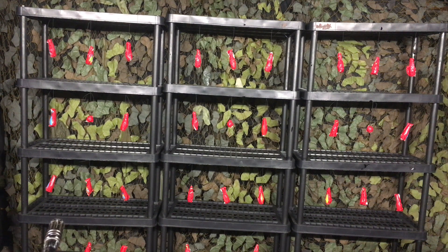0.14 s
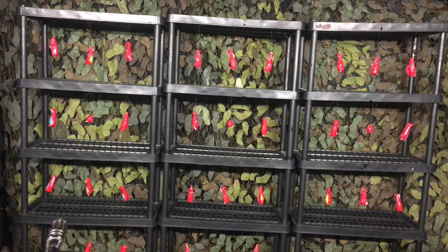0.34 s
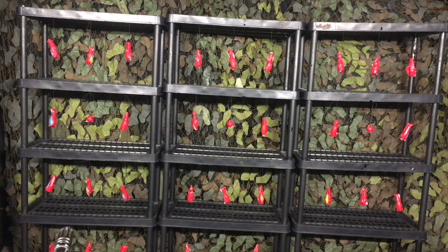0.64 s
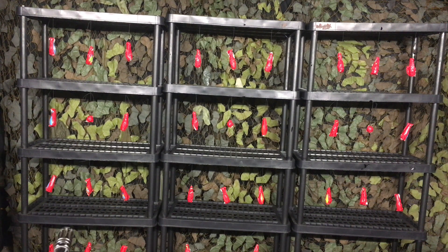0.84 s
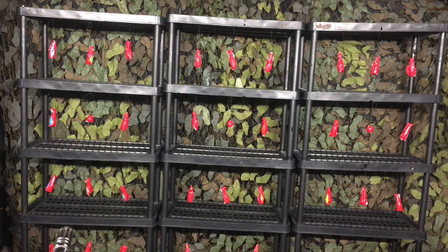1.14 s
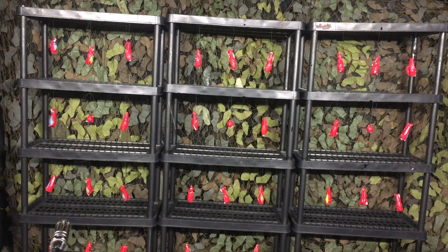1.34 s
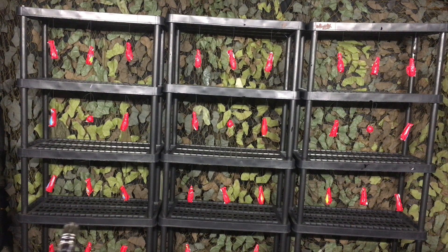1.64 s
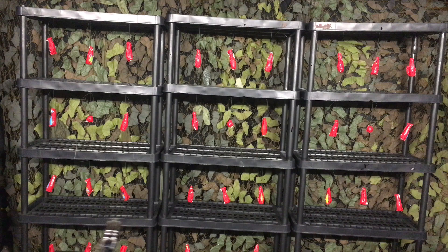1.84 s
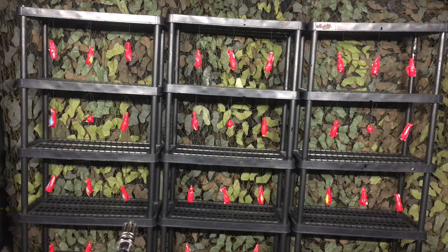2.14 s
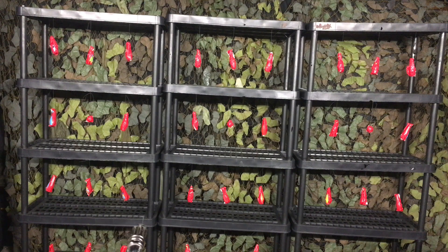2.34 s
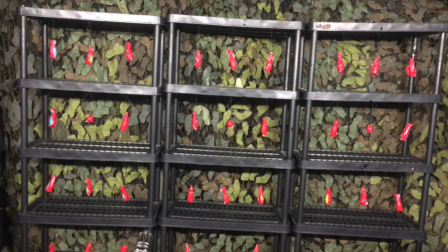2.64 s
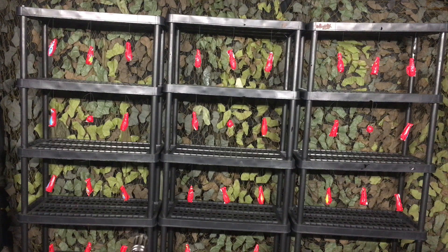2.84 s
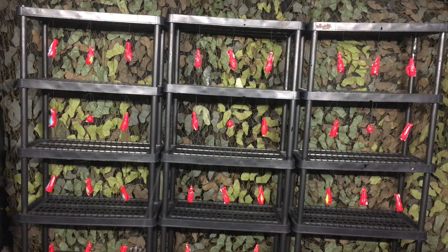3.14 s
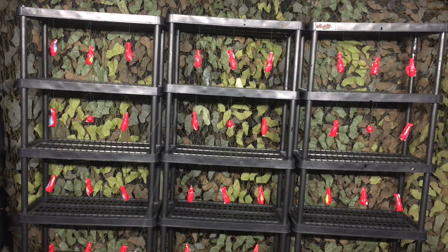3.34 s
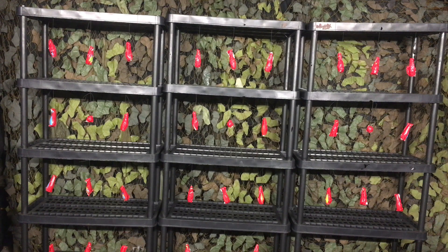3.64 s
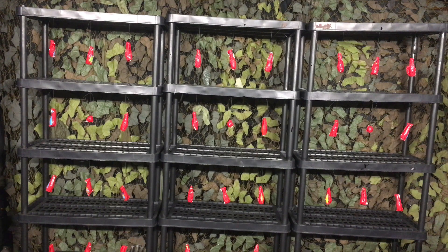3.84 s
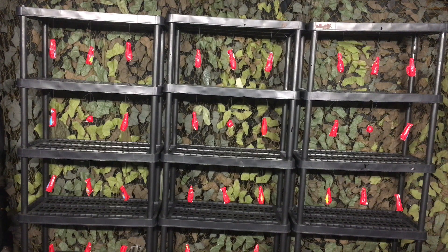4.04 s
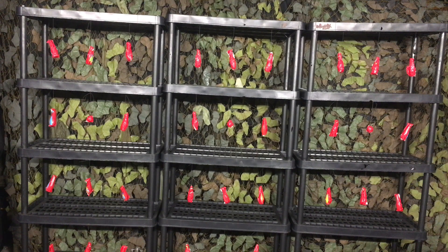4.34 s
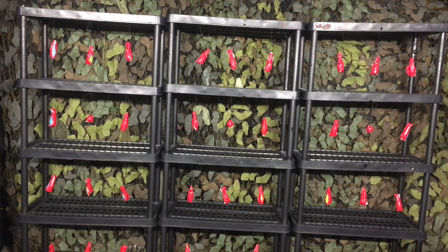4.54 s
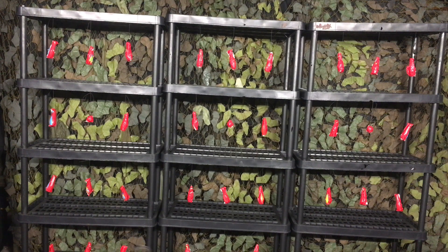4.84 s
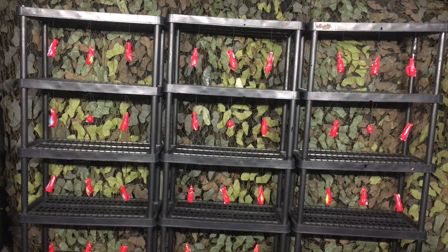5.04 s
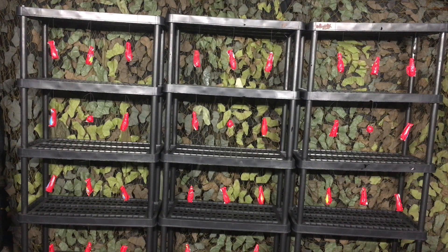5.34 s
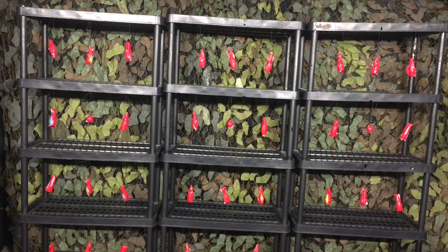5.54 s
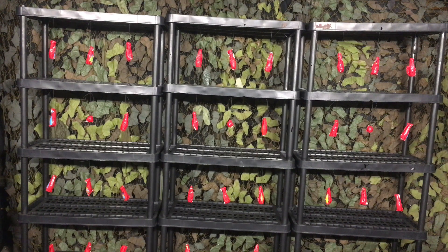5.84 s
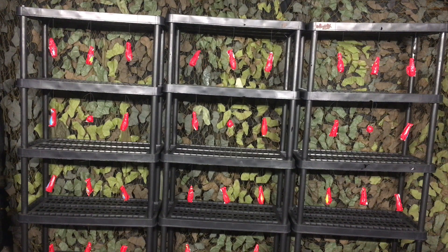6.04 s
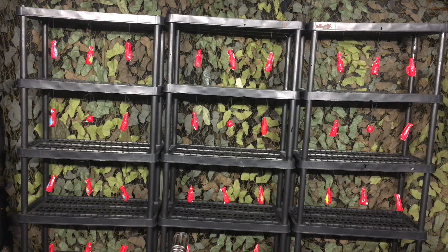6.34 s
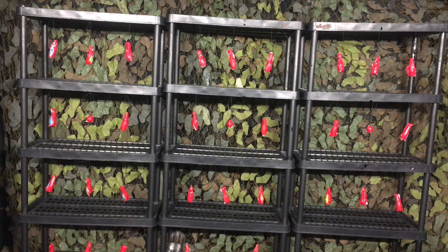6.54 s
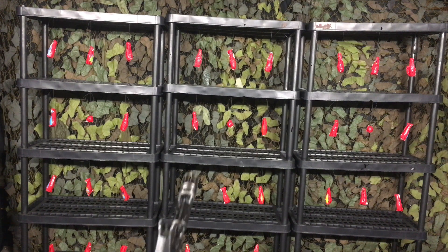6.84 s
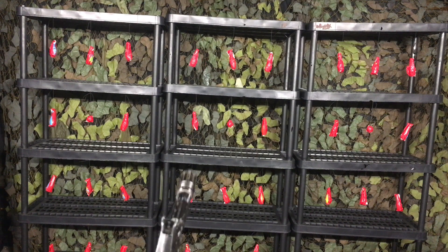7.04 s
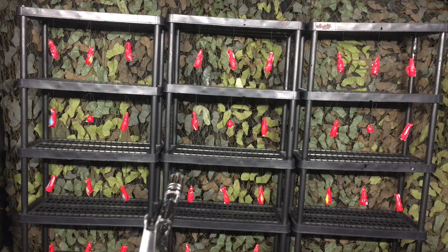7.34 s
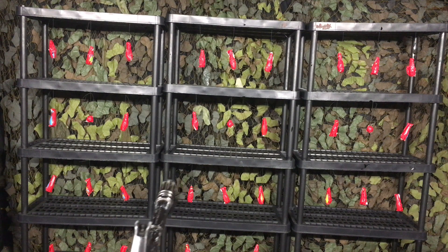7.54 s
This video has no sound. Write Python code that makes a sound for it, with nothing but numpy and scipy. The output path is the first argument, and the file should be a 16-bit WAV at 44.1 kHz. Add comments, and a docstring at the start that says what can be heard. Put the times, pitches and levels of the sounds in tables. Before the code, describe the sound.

A battery-driven pellet gun whirrs and snaps right by the microphone, roughly four shots a second in strings. Pellets crack brightly against hanging targets across the room or thud dully into the backdrop. Between strings, trigger clicks, loose rattles and tiny bouncing pellets are heard over faint humming room noise, with short echoes. The firing thins out, leaving one lone shot at the end.

```python
"""An electric airsoft rifle, close to the microphone, fires single shots in a small indoor range for 7.7 s.
Each cycle starts with motor whine and tooth rasp as the spring winds, then the sear lets go and the piston slams.
Some 40 ms later the pellet cracks into a target or thuds into the backdrop, both made of filtered noise.
Six brisk shots come first, then a second run; after two lone gaps a third brisk run follows from 5.1 to 6.2 s,
then one last shot at 7.6 s. Clicks and spent pellets sound between; faint handling ticks and room noise lie below."""
import sys
import numpy as np
from scipy import signal
from scipy.fft import rfft, irfft
from scipy.io import wavfile
from scipy.ndimage import uniform_filter1d

SR = 44100
rng = np.random.default_rng(int(sys.argv[2]) if len(sys.argv) > 2 else 0)


def master_out(mix):
    """Clip the mix to full scale and print it as 16-bit PCM to the path in sys.argv[1]."""
    frames = np.transpose(np.atleast_2d(mix))
    ceiling = np.clip(frames, -1, 1)
    pcm = np.round(ceiling * 32767).astype(np.int16)
    wavfile.write(sys.argv[1], SR, pcm)


N = 339570
SIZE = 16384  # samples in one sound event
AGE = np.arange(SIZE) / SR  # s since the event began
FREQS = np.maximum(np.fft.rfftfreq(SIZE, 1 / SR), 1)  # Hz

# Shots, close by: [piston slam t/s, top motor speed f/Hz, relative gearbox level/dB]
SHOT_TIMES = [(0.0739, 573, 2.5), (0.3378, 545, -3), (0.576, 538, -2.0), (0.8161, 565, -1.5),
              (1.0823, 555, -2), (1.3305, 560, -0.5), (2.0119, 579, 2.5), (2.2667, 596, -2.5),
              (2.4945, 567, -1.6), (2.7144, 565, -3), (3.16, 555, 0.5), (3.3615, 554, -2.5),
              (3.593, 591, -1), (3.836, 598, 0.5), (4.41, 582, 2.5), (5.0659, 581, 1.5), (5.3537, 553, -1),
              (5.6037, 575, -3.5), (5.8677, 574, -3.5), (6.1766, 597, -0.5), (7.5874, 582, 3.5)]
# Small movements of each cycle: [t/s from the slam, level/dB, centre f/Hz, width f/Hz, t60/s]
# In order: nozzle slides back, next pellet is fed, sear lets go, piston pushes air ahead of it,
# nozzle snaps shut, a noisy crunch as the piston slams.
MECHANISM_NOISES = [(-.043, -40, 166.2, 105.9, 0.076), (-.0135, -39, 11500, 6740, 0.15),
                    (-.0094, -21, 1444, 1237, 0.045), (-.003, -24, 268.5, 303.5, 0.0077),
                    (-.0013, -9.5, 4130, 3500, 0.0032), (.0003, -16, 2720, 3700, 0.012)]
# The piston hits the cylinder head and rebounds: [t/s from the slam, relative level/dB]
PISTON_BLOWS = [(.0003, -3), (.00088, 3.5), (.0025, 2)]
# Modes of the gearbox shell: [f/Hz, level/dB, t60/s]
SHELL_MODES = [(640, -44.5, 0.0012), (1160, -33.5, 0.0061), (1143, -18.5, 0.01), (1385, -36, 0.027),
               (2028, -15.5, 0.0056), (2620, -18.5, 0.0065), (3220, -21.5, 0.0062), (4070, -38.5, 0.0018),
               (6070, -18, 0.002)]
# The spring kicks the stock at release and again at the slam: [t/s from the slam, relative level/dB]
SPRING_KICKS = [(-.009, -1), (.003, 1)]
# Modes of stock and receiver: [f/Hz, level/dB, t60/s]
STOCK_MODES = [(70, -30, 0.059), (146, -37, 0.09), (207.2, -24, 0.043), (289.4, -25.5, 0.041),
               (330, -30.5, 0.16), (564, -37, 0.052), (701, -42.5, 0.17)]


def rifle(wind_s=0.095, run_s=0.0809, gear_db=-1, action_db=0, slam_db=1, kick_db=0):
    """Each shot is one gearbox cycle: motor, small noises, piston blows on the shell, kicks on the stock."""
    out = np.zeros(N)
    for s, top_hz, level_db in SHOT_TIMES:
        add(out, s - wind_s, from_db(gear_db + level_db) * gearbox(top_hz, run_s))
        for lag, db, hz, width, t60 in MECHANISM_NOISES:
            burst = noise(resonance(hz, width) ** 2)
            add(out, s + lag, from_db(action_db + db) * burst / burst.std() * fade(t60))
        shell = high_pass(struck(SHELL_MODES, scatter_db=4.76), hz=149)
        stock = high_pass(struck(STOCK_MODES, scatter_db=3.0), hz=87)
        for lag, db in PISTON_BLOWS:
            add(out, s + lag, from_db(slam_db + db) * shell)
        # the two kicks push in opposite directions
        for (lag, db), direction in zip(SPRING_KICKS, (1, -1)):
            add(out, s + lag, direction * from_db(kick_db + db) * stock)
    return out


# Gear whine: [multiple of the motor speed, rms level/dB before housing and load]
WHINE_ORDERS = [(1, -53), (2, -46), (3, -34), (4, -41.5), (5, -38), (6, -31.5), (8, -40), (10, -42),
                (12, -52)]
# Rasp of the gear teeth: [f/Hz, relative density/dB]
TOOTH_RASP = [(120, -42), (500, -26), (950, -31), (1170, -24), (1450, -32), (2100, -22), (3000, -22),
              (4300, -24), (5000, -32.5), (7000, -32.5), (10500, -46), (15000, -40.5)]
# The gearbox housing favours some pitches of the whine: [f/Hz, width f/Hz, gain/dB]
HOUSING_PEAKS = [(1080, 220, -1.5), (1370, 100, -4.5), (2000, 340, 3.5), (2850, 490, -3), (3163, 53, 11.5),
                 (4155, 300, 7.5), (5540, 5600, -8.5)]


def gearbox(top_hz, run_s, spin_up_s=0.023, load_s=0.028, brake_s=0.0055, tooth_depth=0.17):
    """The motor spins up; whine and tooth rasp grow as the spring loads and die once it is released."""
    speed = top_hz * (1 - np.exp(-AGE / spin_up_s))
    speed = speed * (1 + .006 * flutter(hz=80))
    angle = 2 * np.pi * np.cumsum(speed) / SR
    running = np.exp(-np.maximum(AGE - run_s, 0) / brake_s)
    load = 1 - np.exp(-(AGE / load_s) ** 2)
    housing = peaks(HOUSING_PEAKS)
    whine = 0
    for k, db in WHINE_ORDERS:
        # the teeth mesh unevenly, so each order stutters as it sweeps through the housing's resonances
        stutter = from_db(2.5 * flutter(hz=70) + 1.5 * rng.standard_normal())
        phase = rng.uniform(0, 2 * np.pi) + .15 * flutter(hz=150)
        tone = np.sin(round(k) * angle + phase)
        housing_gain = np.interp(k * speed, FREQS, housing)
        whine = whine + from_db(db) * housing_gain * load ** (k / 5) * stutter * tone
    rasp = noise(colour(TOOTH_RASP)) * (1 + tooth_depth * np.sin(angle)) * load
    return (np.sqrt(2) * whine + high_pass(rasp, hz=250)) * running


# Trigger and handling clicks, right at the microphone, levels relative:
# [t/s, grip knock level/dB, metal tick level/dB, tick f/Hz, rattle level/dB]
TRIGGER_CLICKS = [(0.5101, -26, -25, 9500, -20), (0.7626, -31, -14, 7530, -22),
                  (1.5097, -22, -24.5, 3520, -8.5), (1.6003, -29.5, -32.5, 4170, -2.5),
                  (1.9195, -26, -18.5, 8400, -6.5), (2.974, -42, -36, 4000, 1),
                  (2.994, -23.5, -23, 3760, -14), (3.0112, -31.5, -20.5, 6460, -3),
                  (4.1545, -23.5, -23, 3750, -33), (4.193, -25, -53, 3500, -21),
                  (4.2967, -25.5, -26.5, 3100, -5.5), (4.832, -29, -48, 6000, -14),
                  (6.5138, -27.5, -29, 3500, -22), (6.932, -15.5, -17.5, 9100, -15),
                  (7.263, -26.5, -58, 2500, -24)]
# Colour of the hollow grip: [f/Hz, relative density/dB]
GRIP_COLOUR = [(200, -21.5), (500, -13.5), (950, -2), (1600, 1), (2300, 7), (3300, -17), (6000, -32),
               (15000, -50)]


def trigger(level_db=4, t60=0.0074, rattle_t60=0.14, tick_width=1.0, knock_rise_s=0.00046):
    """Short noise clicks in the hollow grip; loose parts rattle on more slowly after each."""
    out = np.zeros(N)
    for s, knock_db, tick_db, tick_hz, rattle_db in TRIGGER_CLICKS:
        knock = from_db(knock_db) * noise(colour(GRIP_COLOUR)) * (1 - np.exp(-AGE / knock_rise_s))
        tick = from_db(tick_db) * noise(resonance(tick_hz, tick_width * tick_hz) ** 2)
        decay = from_db(level_db) * fade(t60) + from_db(rattle_db) * fade(rattle_t60)
        add(out, s, (knock + tick) * decay)
    return out


def handling(per_s=26, level_db=-52, spread_db=5):
    """Hands shifting on the rifle: faint noise ticks of uneven strength at random times."""
    strength_db = level_db + np.minimum(spread_db * rng.standard_normal(N), 10)
    ticks = (rng.random(N) < per_s / SR) * from_db(strength_db)
    tick = noise(colour([(500, 2.0), (1700, -1), (5000, -12.5), (15000, -13.5)])) * fade(t60=0.018)
    return signal.fftconvolve(ticks, tick)[:N]


# Pellets on a target across the room: [t/s, relative level/dB, lowest mode f/Hz,
# brightness/dB per octave, relative crack over ring-out/dB, strongest ring f/Hz]
TARGET_HITS = [(0.1104, -20, 2600, -1.5, 9.5, 5260), (0.3789, -21, 2350, -1, 8.5, 6800),
               (0.615, -18.5, 2000, -2, 4.5, 5600), (0.855, -20, 1090, .3, 8, 3400),
               (1.1231, -26, 1040, -0.5, 10, 8400), (1.367, -15.5, 3130, -4, 1.5, 3600),
               (2.0484, -16, 1800, -3, 1.5, 3440), (2.3032, -17, 2340, -2, 2.5, 5730),
               (2.5343, -15, 980, -3, 2.5, 961), (2.7544, -17, 2440, -5, 4, 6380),
               (3.6351, -23.5, 2000, -4.5, 10, 3300), (4.441, -31.5, 1300, 2.5, 8, 6400),
               (4.4551, -29, 1010, -3, 11.5, 4500), (5.1112, -23.5, 1410, -2, 11, 2270),
               (5.3977, -22, 1960, -3.5, 8, 5500), (5.6393, -17.5, 2320, -1.5, 3.5, 5340),
               (5.905, -19, 2620, -3, 9.5, 3830)]
# Misses on the backdrop: [t/s, relative level/dB, brightness/dB per octave, strongest ring f/Hz]
BACKDROP_THUDS = [(3.2003, -15, -2, 920), (3.4039, -17, 0.6, 1015), (3.878, -19, 1.8, 1024),
                  (6.2224, -18.5, 0, 1500), (7.6329, -18.5, 2, 1120)]
# The backdrop's dull colour: [f/Hz, gain/dB]
BACKDROP_COLOUR = [(350, 3.5), (950, 1), (2000, -5), (3700, -15), (6200, -19.5), (11000, -26)]
# Spent pellets off shelves and floor: [t/s, relative level/dB, lowest mode f/Hz, brightness/dB per octave]
PELLET_BOUNCES = [(1.5703, -49, 2110, -4), (1.626, -47, 1980, -3), (1.8212, -57.5, 3380, 2.5),
                  (2.834, -27.5, 2500, -3), (3.0369, -31, 1985, 1), (4.0022, -41, 980, -0.5),
                  (6.049, -42, 2410, -4.5), (6.6278, -56, 2346, -8), (6.819, -53, 3600, -11),
                  (7.119, -58.5, 1030, -11)]


def pellets(hit_db=2.0, miss_db=4.0, ricochet_db=4.0):
    """Targets crack brightly, the backdrop thuds, spent pellets tick: one impact each on its own body."""
    out = np.zeros(N)
    for s, db, mode_hz, brightness_db, crack_db, ring_hz in TARGET_HITS:
        body = small_body(mode_hz, brightness_db)
        add(out, s, from_db(hit_db + db) * impact(body, crack_db, ring_hz))
    backdrop = colour(BACKDROP_COLOUR) * low_cut(hz=213)
    for s, db, brightness_db, ring_hz in BACKDROP_THUDS:
        body = backdrop * slope(brightness_db, pivot_hz=1200)
        add(out, s, from_db(miss_db + db) * impact(body, crack_db=12, ring_hz=ring_hz))
    for s, db, mode_hz, brightness_db in PELLET_BOUNCES:
        body = small_body(mode_hz, brightness_db)
        add(out, s, from_db(ricochet_db + db) * impact(body, crack_db=4.5, ring_hz=mode_hz))
    return out


# Resonances that colour the echoes of every impact: [f/Hz, width f/Hz, gain/dB]
TARGET_RINGS = [(3350, 190, 3.5), (4087, 72, 6), (5570, 310, 2.5), (5880, 69, 3.5), (6600, 360, 5),
                (9630, 1500, 6.5), (10260, 350, -7.5)]


def impact(struck_thing, crack_db, ring_hz, t60=.22, ring_db=7, ring_share=0.031,
           snap_db=13, snap_bright_db=3.0, build_s=0.00078, crack_s=.008, crack_offset_db=-6,
           grain_db=4, grain_s=0.0023, ripple_db=2):
    """A snap with the colour of the thing struck, then reflections that thicken into the room's tail."""
    target = peaks(TARGET_RINGS) * colour([(11000, 2.0), (15500, -3.5)])
    direct = from_db(snap_db) * struck_thing * slope(snap_bright_db, pivot_hz=5000)
    snap = np.roll(irfft(direct), 12)  # the pulse is symmetric: make room for its first half
    # each spot that is struck favours its own narrow resonances
    ripple = uniform_filter1d(rng.standard_normal(len(FREQS)), size=30)
    ring = ring_db * resonance(ring_hz, ring_share * ring_hz)
    spot = from_db(ring + ripple_db * ripple / ripple.std())
    # the first reflections arrive one by one: grains of 16 samples, uneven at first
    spread = np.log(from_db(grain_db)) * np.exp(-AGE / grain_s)
    grain = np.exp(spread * np.repeat(rng.standard_normal(SIZE // 16), 16) - spread ** 2)
    echoes = noise(struck_thing * target * spot) * grain * (1 - np.exp(-AGE / build_s))
    crack = from_db((crack_db + crack_offset_db) * np.exp(-(AGE / crack_s) ** 2))
    return (snap + echoes) * crack * fade(t60)


def small_body(mode_hz, brightness_db, damping=0.91):
    """A small hard object radiates little below its lowest mode, peaks there and slopes off above it."""
    radiated = resonance(mode_hz, damping * mode_hz) * FREQS / (damping * mode_hz)
    return radiated * slope(brightness_db, pivot_hz=4030)


# The room's answer to the rifle: [f/Hz, relative gain/dB]
ROOM_COLOUR = [(60, -21.5), (250, -11), (700, -4.5), (1200, -4.5), (3000, -7.5), (6000, -0.5),
               (15000, -8.5)]


def room(x, first_s=0.0074, t60=0.25, early_db=-31, early_t60=0.02, shift_hz=1470):
    """Reflections off floor and shelves as decaying noise, partly renewed every quarter second."""
    shape = (fade(t60) + from_db(early_db) * fade(early_t60)) * (AGE > first_s)
    shape = shape / np.sqrt(np.sum(shape ** 2))
    walls = colour(ROOM_COLOUR)
    shift = np.clip(FREQS / shift_hz, 0, .9)  # renewed share of the power, greater at higher pitch
    steady = irfft(rfft(noise(walls)) * np.sqrt(1 - shift))
    out, step = np.zeros(N), SR // 4
    for at in range(0, N, step):
        answer = (steady + noise(walls * np.sqrt(shift))) * shape
        add(out, at / SR, signal.fftconvolve(x[at:at + step], answer))
    return out


# Background colour: [f/Hz, relative density/dB]
AIR_COLOUR = [(15, -59), (25, -22), (40, -12), (52, 2), (120, -9), (153, -1.5), (344, -12), (373, -6),
              (405, -16.5), (775, -16), (1560, -10), (1740, -7), (1890, -14), (2700, -14.5), (3150, -12),
              (3700, -17), (4450, -16.5), (5100, -22), (16000, -40)]
# The background swells and sinks: [t/s, relative level/dB]
AIR_LEVEL = [(0, 0), (1.8, -1.5), (4.25, 0), (4.8, 0), (6.4, -2), (6.85, -0.5), (7.247, -10.5),
             (7.479, -2.5)]


def background(level_db=-57, hiss_hz=4000, hiss_follow=0.57):
    """Faint humming room noise; its hiss follows the swell more strongly, so it darkens as it sinks."""
    freqs = np.maximum(np.fft.rfftfreq(N, 1 / SR), 1)
    gain = colour(AIR_COLOUR, freqs)
    bright = 1 / (1 + (hiss_hz / freqs) ** 4)
    swell_db = np.interp(np.arange(N) / SR, *np.transpose(AIR_LEVEL))
    low = noise(gain * np.sqrt(1 - bright))
    hiss = noise(gain * np.sqrt(bright)) * from_db(hiss_follow * swell_db)
    air = low + hiss
    return from_db(level_db + swell_db) * air / air.std()


def from_db(db):
    """Turns dB into an amplitude factor."""
    return 10 ** (np.asarray(db) / 20)


def fade(t60):
    """Falls 60 dB in t60 seconds."""
    return np.exp(-np.log(1000) * AGE / t60)


def add(track, s, sound):
    """Mixes a sound into the track from time s on, trimmed at both ends of the track."""
    at = int(round(s * SR))
    sound = sound[max(-at, 0):max(len(track) - at, 0)]
    start = max(at, 0)
    track[start:start + len(sound)] += sound


def colour(points, freqs=FREQS):
    """Gain per frequency from (Hz, dB) points, joined on a log frequency axis."""
    hz, db = np.transpose(points)
    return from_db(np.interp(np.log(freqs), np.log(hz), db))


def noise(gain):
    """Noise with the given gain per frequency."""
    return irfft(rfft(rng.standard_normal(2 * len(gain) - 2)) * gain)


def resonance(hz, width):
    """Gain of one resonance, 1 on top."""
    return 1 / np.sqrt(1 + ((FREQS ** 2 - hz ** 2) / (FREQS * width)) ** 2)


def peaks(resonances):
    """Gain per frequency of (Hz, width in Hz, dB) peaks and dips."""
    return from_db(sum(db * resonance(hz, width) for hz, width, db in resonances))


def slope(db_per_octave, pivot_hz):
    """Gain that brightens or dulls a sound about the pivot; flat below 500 Hz."""
    return from_db(db_per_octave * np.log2(np.maximum(FREQS, 500) / pivot_hz))


def low_cut(hz):
    """Gain of a second-order high-pass."""
    return 1 / np.sqrt(1 + (hz / FREQS) ** 4)


def high_pass(x, hz):
    """Takes away the bass below hz."""
    return signal.sosfilt(signal.butter(2, hz, "high", fs=SR, output="sos"), x)


def flutter(hz):
    """Random unsteadiness, mostly near hz and slower than a few times hz, with a standard deviation of 1."""
    wander = noise(low_cut(hz) / FREQS ** 2 * (FREQS > 10))
    return wander / wander.std()


def struck(modes, scatter_db):
    """One blow: every mode rings with a slightly different strength and pitch."""
    out = 0
    for hz, db, t60 in modes:
        strength = from_db(db + scatter_db * rng.standard_normal())
        pitch = hz * (1 + rng.standard_normal() / 100)
        out = out + strength * np.sin(2 * np.pi * pitch * AGE) * fade(t60)
    return out


def scene():
    """The rifle is close and excites the room; the targets are across it, with echoes of their own."""
    near = rifle() + trigger() + handling()
    return (near + room(near) + pellets() + background())[None]


def record(dry, ceiling=.52, cutoff_hz=15900):
    """At the microphone the deepest bass is lost, peaks are rounded off and the top is cut."""
    dry = high_pass(high_pass(dry, hz=45), hz=39.7)
    rounded = dry / (1 + (dry / ceiling) ** 4) ** (1 / 4)
    return signal.sosfilt(signal.ellip(10, .2, 70, cutoff_hz, fs=SR, output="sos"), rounded)


dry = scene()
out = record(dry)
master_out(out)
```